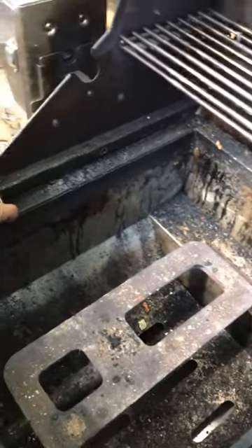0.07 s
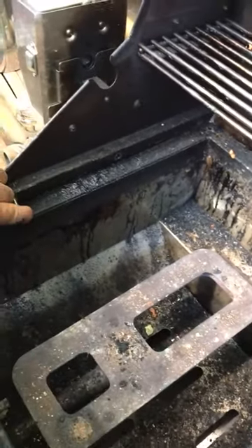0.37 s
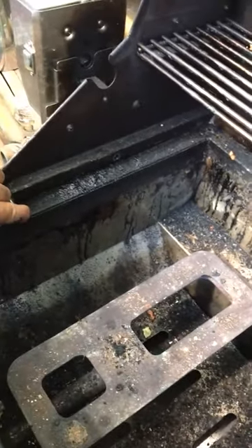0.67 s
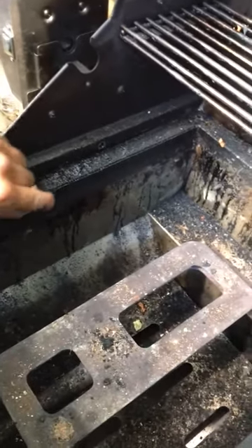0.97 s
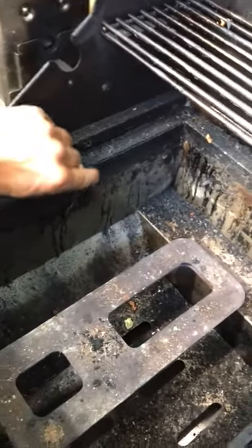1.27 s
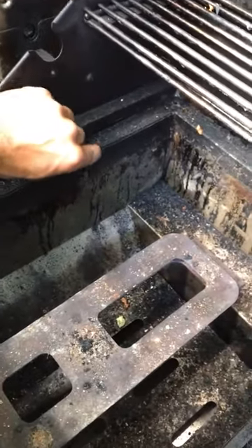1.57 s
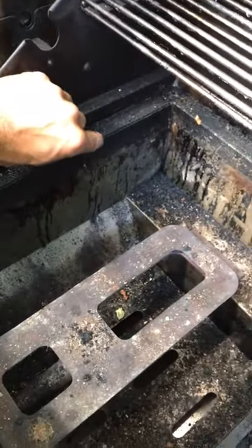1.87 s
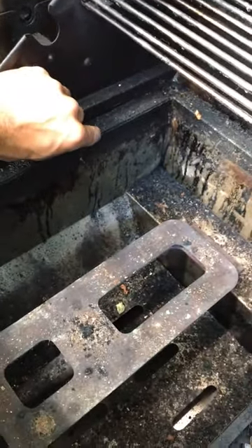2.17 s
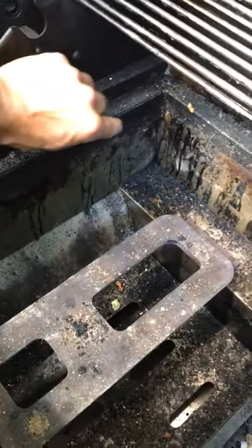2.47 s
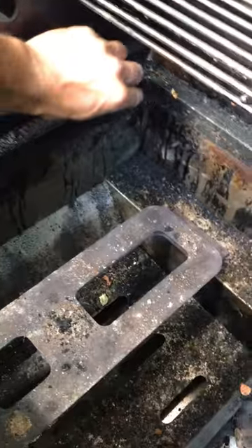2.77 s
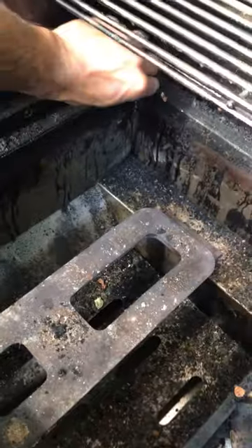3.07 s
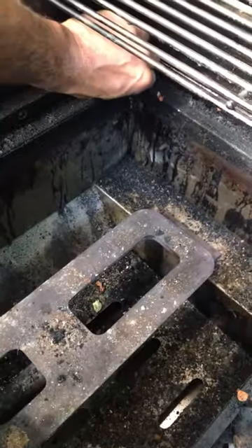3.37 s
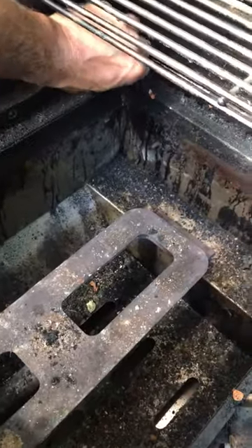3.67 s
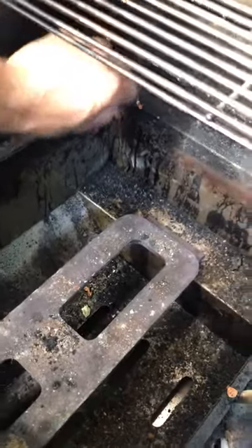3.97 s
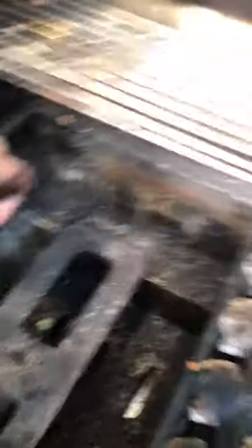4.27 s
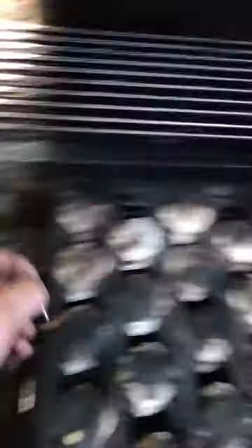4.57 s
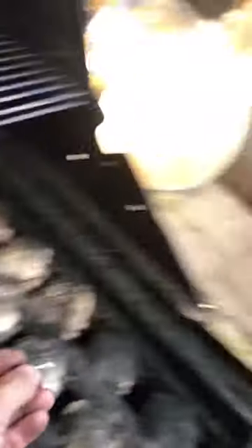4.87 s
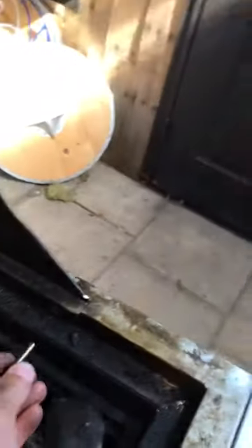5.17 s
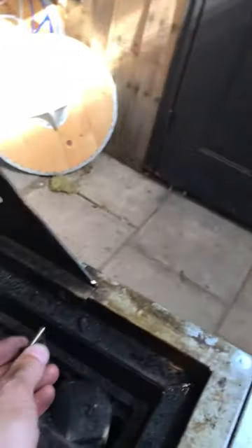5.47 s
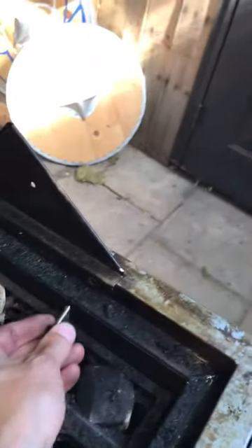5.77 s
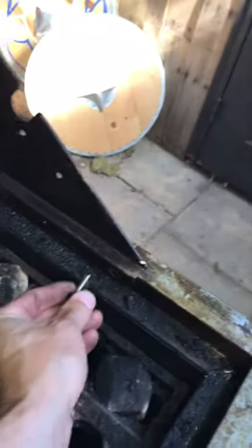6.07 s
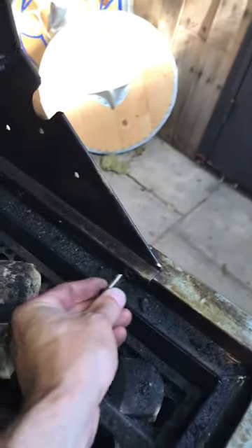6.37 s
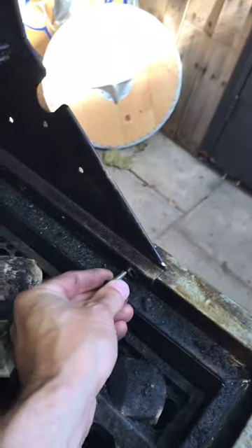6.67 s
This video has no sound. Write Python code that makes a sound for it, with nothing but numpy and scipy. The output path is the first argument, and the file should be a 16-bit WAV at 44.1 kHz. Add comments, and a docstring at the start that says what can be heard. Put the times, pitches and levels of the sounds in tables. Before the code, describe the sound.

A hand taps a small pin on barbecue steel with briefly ringing clicks while distant motors hum faintly outdoors.

```python
"""Sharp metal clicks with a brief ring: a hand works a small pin against a gas barbecue's firebox.
Each touch rings the pin and the greasy sheet steel, and the paved yard answers. Fingers rub the rim,
bump the warming rack once and draw back with a few dry ticks. Two distant motors drone under a soft
outdoor rumble; their balance shifts as the listener steps to the side of the barbecue."""
import sys
import numpy as np
from scipy import signal
from scipy.fft import rfft, irfft, next_fast_len
from scipy.io import wavfile

SR = 44100
rng = np.random.default_rng(int(sys.argv[2]) if len(sys.argv) > 2 else 0)


def unload_audio(sound):
    """Save the sound as a 16-bit wav file, at the path given as the first command line argument."""
    columns = np.transpose(np.atleast_2d(sound))
    # keep every value between -1 and 1, then stretch to whole-number steps
    steps = np.round(np.clip(columns, -1, 1) * 32767)
    wavfile.write(sys.argv[1], SR, steps.astype(np.int16))


N = 300762
TIME_S = np.arange(N) / SR

# Pin on steel. Each row: start in seconds, relative level in dB, contact pitch in Hz, fall below and
# above it in dB/octave, freedom to ring in dB, rim lift in dB, ping pitch in Hz, ping level in dB.
TOUCHES = [(0.718, -56, 5500, -1.5, 8, -4, 0, 4700, -60), (0.744, -43.5, 6150, 7, 16, -1, -3, 6470, -48),
           (0.750, -47, 7000, 3.5, 9, -5, 7, 2750, -57), (0.797, -37, 7200, 7, 9, -1, 7.5, 5170, -41),
           (0.804, -36.5, 1450, 6.5, 0, -5.5, -6, 8700, -42),
           (1.7594, -21, 3950, 10, 16, -12.5, -7, 8260, -37.5),
           (1.7618, -42, 2250, -0.5, 7, 3.5, 13, 2570, -24),
           (1.861, -51.5, 4000, 3.5, 11.5, 6, 3.5, 8100, -69),
           (1.9763, -19.5, 8200, 3, 17.5, -6.5, 1, 6620, -21.5),
           (1.9788, -23, 9800, 8, 19, 2, -2, 9590, -26), (1.983, -21, 2000, 11.5, 4.5, -2, 2, 1880, -22),
           (1.9845, -29, 6600, 9, 5.5, -0.5, 0, 6500, -26.5),
           (2.05, -18, 4930, 6, 16, -11.5, -13, 4750, -24.5),
           (2.0535, -27.5, 6100, 5.5, 8, -10.5, -10, 6056, -29),
           (2.334, -65.5, 6020, 0.5, 10, 10.5, 4, 6610, -57), (2.344, -58, 3500, 0, 13, -1, -2, 4500, -57),
           (2.356, -48.5, 4800, 1.5, 9, 0, -7, 3130, -50), (3.588, -50, 11500, 27, 18, -13, 1, 9770, -64),
           (6.742, -55, 1410, 5.5, 1.5, -5.5, 3.5, 1150, -53)]
# Clear modes of firebox and pin. Each row: pitch in Hz, relative level in dB, T60 in seconds.
STEEL_MODES = [(556, -7, .35), (594, -2, .26), (621, -3, .5), (656, -3.5, .42), (1272, -8, .45),
               (1305, -8, .25), (1353, -1, .2), (1460, -16, .35), (1565, -15, .3), (1826, -2.5, .16),
               (1852, -10, .3), (1908, -7, .3), (1974, -8, .24), (2086, -8.5, .25), (2140, -7, .17),
               (2210, -10, .33), (2298, -12, .25), (2350, -14, .22), (2477, -10, .23), (2548, -14, .19),
               (2768, -7, .13), (2860, -10, .19), (3190, -13, .2), (3365, -9, .13), (3413, -13, .16),
               (3780, -10, .11), (3930, -10, .14), (4350, -12, .16), (4490, -9, .12), (4576, -9, .14),
               (4745, -10, .11), (5017, -11, .14), (5130, -7.5, .12), (5600, -12, .13), (5776, -10, .11),
               (6056, -8, .1), (6503, -1, .09), (6605, -5, .1), (7063, -14, .16), (7250, -7, .14),
               (8030, -5, .07), (8660, -5, .105), (9520, -8, .07), (9590, -6, .07), (9935, -8, .07),
               (10039, -1, .08), (11300, -11, .08), (11640, -8, .08), (13200, -8, .08)]
# Yard reverberation. Each row: frequency in Hz, level re the blow in dB, T60 in seconds.
YARD = [(200, -5, 0.566), (625, 4, 0.45), (900, -2, 0.51), (1500, -7, 0.38), (2000, -5, 0.48),
        (5020, -7, 0.21), (9000, -16, 0.17), (15070, -22.5, 0.1692)]


def blows(hz, scatter_db, damping_share):
    """One impulse a touch, weighted at hz by contact and rim resonance; a tight grip damps the ring."""
    flat_below_hz, rim_hz, rim_width_oct = 780, 2576, 0.38
    near_rim = np.exp(-(np.log2(hz / rim_hz) / rim_width_oct) ** 2)
    impulses = np.zeros(N)
    for start_s, db, contact_hz, below_db_oct, above_db_oct, ring_db, rim_db, *_ in TOUCHES:
        octaves = np.log2(max(hz, flat_below_hz) / contact_hz)
        db -= abs(octaves) * (above_db_oct if octaves > 0 else below_db_oct)
        db += near_rim * rim_db + damping_share * ring_db
        impulses[round(start_s * SR)] = from_db(db + scatter_db * rng.standard_normal())
    return impulses


def steel_ring(level_db, scatter_db):
    """Each touch shares its force differently among the modes; neighbours swing in opposite senses."""
    waver_db, out = 1.5, 0
    for k, (hz, db, t60_s) in enumerate(STEEL_MODES):
        impulses = from_db(level_db + db) * blows(hz, scatter_db, damping_share=0.85)
        out += (-1) ** k * ring(impulses, hz, t60_s) * from_db(waver_db * drift(19))
        if hz < 3000:   # the hollow firebox holds the lower modes in a wavering afterglow
            _, tail_t60_s = at_hz(YARD, hz)
            out += np.sqrt(decay(impulses ** 2, tail_t60_s)) * noise_band(hz, width_hz=36, db=-13)
    return out


def pings():
    """The mode that swings most at the struck spot takes the first shock: a short ping."""
    out, modes_hz = 0, np.array(STEEL_MODES)[:, 0]
    for start_s, *_, ping_hz, ping_db in TOUCHES:
        hz = modes_hz[np.argmin(abs(modes_hz - ping_hz))]
        out += from_db(ping_db) * ring(signal.unit_impulse(N, round(start_s * SR)), hz, t60_s=0.047)
    return out


def sheet_clack(level_db, scatter_db):
    """A brief crack, then damped sheet modes blurring into a clack; the yard keeps a duller tail."""
    # Weak sheet modes. Each row: frequency in Hz, relative band level in dB, T60 in seconds.
    sheet = [(169, -4.5, 0.33), (301, -17, 0.23), (479, -25, 0.15), (628.6, -5, 0.06), (720, -19.5, 0.1295),
             (935, -5.5, 0.093), (1298, 0, 0.066), (2287, -4.5, 0.052), (3270, -6, 0.15),
             (4620, -1.5, 0.041), (7000, -0.5, 0.05), (9600, -1.5, 0.083), (10680, -6.5, 0.055),
             (11910, 1, 0.0477), (14780, -8.5, 0.037)]
    edges_hz = np.geomspace(20, 17000, 40)   # quarter octaves
    centres_hz = np.sqrt(edges_hz[1:] * edges_hz[:-1])
    crowds = [mode_crowd(spacing_hz=104.9, blur=0.66) for _ in range(2)]
    out = np.zeros(N)
    for k in np.flatnonzero(centres_hz > sheet[0][0]):
        hz, low_hz, high_hz = centres_hz[k], edges_hz[k], edges_hz[k + 1]
        db, t60_s = at_hz(sheet, hz)
        yard_db, yard_t60_s = at_hz(YARD, hz)
        hardness = 2 * hz ** 2 / (hz ** 2 + 1500 ** 2)   # a light pin cracks mainly in the treble
        crack = hardness * decay(blows(hz, scatter_db, damping_share=0) ** 2, t60_s=0.01216)
        stored = blows(hz, scatter_db, damping_share=0.49) ** 2
        energy = crack + decay(stored, t60_s) + from_db(yard_db) ** 2 * decay(stored, yard_t60_s)
        envelope = np.sqrt(energy * SR / 2 / (high_hz - low_hz))
        out += from_db(level_db + db) * bandpass(crowds[k % 2] * envelope, low_hz, high_hz)
    return out


def pin_clicks():
    """Pin strikes steel: ping, ring and echoed clack, with a narrow hollow in the treble."""
    # Reflections off firebox walls and raised lid. Each row: delay in seconds, gain.
    lid_echoes = [(.0023, 0.16), (.0052, -0.14), (.0094, .22)]
    notch_hz, notch_width_hz = 10400, 550
    clicks = pings() + steel_ring(level_db=-6.0, scatter_db=2.9)
    clicks += echoed(sheet_clack(level_db=-9.5, scatter_db=1.96), lid_echoes)
    return signal.lfilter(*signal.iirnotch(notch_hz, notch_hz / notch_width_hz, fs=SR), clicks)


def rack_knock(start_s):
    """A soft bump wakes clusters of modes, most around a clear tone; the treble dies first."""
    # Rack and hood resonances. Each row: pitch in Hz, width in Hz, level in dB, T60 in seconds,
    # tone share from 0 to 1.
    clusters = [(224, 53, -54, 0.68, .3), (312, 33, -58, 0.63, 0.8), (422, 240, -49, 0.16, 0),
                (638, 87, -51, 0.6, 0.43), (876, 180, -48.5, 0.49, 0.04), (987, 110, -52.5, 0.31, 0.2),
                (1050, 840, -47, .05, 0.2), (1063, 150, -49.5, 0.39, 0.1), (1200, 74, -57.5, 0.41, 0.3),
                (1610, 220, -64.5, 0.27, 0.1), (2100, 430, -53.5, 0.28, 0.15),
                (4880, 650, -50.5, 0.12, 0.1), (5760, 540, -54.5, 0.088, 0), (9500, 800, -57, 0.041, 0.2),
                (13000, 2500, -64.5, .04, 0)]
    out, age_s = 0, TIME_S - start_s
    for hz, width_hz, db, t60_s, tone_share in clusters:
        envelope = (age_s > 0) * from_db(db - 60 * np.clip(age_s / t60_s, 0, 3))
        noise = np.sqrt((1 - tone_share) * SR / 2 / width_hz) * rng.standard_normal(N)
        tone = np.sqrt(2 * tone_share) * np.sin(2 * np.pi * hz * age_s)
        out += bandpass(envelope * (noise + tone) + 1e-18, hz - width_hz / 2, hz + width_hz / 2)
    return out


def dry_ticks():
    """The hand draws back: very short cracks with duller after-rings, and a soft scrape."""
    # Ticks. Each row: start in seconds, crack level in dB, after-ring level in dB.
    ticks = [(4.203, -57, -61), (4.207, -56, -59), (4.2305, -47, -57), (4.235, -47, -63),
             (4.2708, -46, -56), (4.3078, -45, -44.5), (4.311, -53, -49.5), (4.319, -54, -52)]
    # Crack and after-ring spectra. Each row: frequency in Hz, relative density in dB.
    crack_colour = [(700, 3.5), (1500, 0), (2450, 4), (3300, -2), (5000, 0.5), (8500, -6.5), (10000, -21),
                    (16000, -24)]
    ring_colour = [(900, 6.5), (1700, -5.5), (2150, 3), (2450, 8.5), (3200, 1), (6500, -6.5), (9000, -25),
                   (10200, -31), (16000, -30)]
    crack_power, ring_power = np.zeros((2, N))
    for start_s, crack_db, ring_db in ticks:
        onset = round(start_s * SR)
        crack_power[onset], ring_power[onset] = from_db([crack_db, ring_db]) ** 2
    scrape = skin_friction([(4.29, 0.054, -62)], crack_colour, grain_db=3.5)
    cracks = np.sqrt(decay(crack_power, t60_s=.014)) * coloured_noise(crack_colour)
    rings = np.sqrt(decay(ring_power, t60_s=.14)) * coloured_noise(ring_colour)
    return scrape + cracks + rings


def skin_friction(strokes, colour, grain_db):
    """Skin catches and slips on the crusted rim: short swells of grainy hiss."""
    pressure = sum(from_db(db) * np.exp(-.5 * ((TIME_S - peak_s) / sigma_s) ** 2)
                   for peak_s, sigma_s, db in strokes)
    return pressure * rms_one(coloured_noise(colour) * from_db(grain_db * drift(97)))


def rim_rubs():
    """Fingers rub the rim; a fingertip skids off it with a thin hiss."""
    # Finger strokes. Each row: peak time in seconds, Gaussian width in seconds, level in dB.
    rubs = [(1.478, 0.025, -74), (2.352, 0.014, -63), (2.64, 0.036, -72), (3.208, 0.013, -74),
            (3.735, 0.014, -72)]
    slips = [(3.385, 0.0065, -58.5), (3.396, 0.011, -59)]
    # Their spectra. Each row: frequency in Hz, relative density in dB.
    rub_colour = [(1500, -1), (4000, -1), (6500, -5), (10000, -5), (13000, -9), (16000, -8)]
    slip_colour = [(3000, -6), (6000, -10.5), (8500, -6), (10000, -1), (12500, 0), (16000, -14.5)]
    return skin_friction(rubs, rub_colour, grain_db=2.5) + skin_friction(slips, slip_colour, grain_db=2)


def motor(firing_hz, orders, waver_db, fundamental_fade_db=0):
    """Only a far motor's low harmonics carry; their balance depends on where one stands."""
    out = 0
    for multiple, firebox_db, side_db in orders:
        db = firebox_db + side_share() * (side_db - firebox_db) + multiple * waver_db * drift(3.94)
        out += harmonic(firing_hz, multiple, db - fundamental_fade_db * (multiple == 1))
    return out


def distant_motors():
    """Two motors beat against each other as both slow; a fainter whir sinks with them."""
    # Motor harmonics. Each row: multiple, level at the firebox in dB, level at the side in dB.
    orders_a = [(1, -53, -50.5), (2, -51.5, -46.5), (3, -74.5, -74.5)]
    orders_b = [(2, -53, -51.5), (3, -69, -59), (4, -65, -65), (5, -69.5, -68.5)]
    a_hz = 78.63 - 1.07 * np.maximum(TIME_S - 3.7, 0)
    b_hz = 68.55 - .135 * TIME_S
    fade_db = 6 * np.maximum(TIME_S - 5.4, 0)
    whir = harmonic(175.5 - 1.8 * TIME_S, multiple=1, db=-63 + 2 * drift(2.017))
    motor_a = motor(a_hz, orders_a, waver_db=0.5, fundamental_fade_db=fade_db)
    return motor_a + motor(b_hz, orders_b, waver_db=0.37) + whir


def outdoors():
    """Far rumble with boomy bands, one swelling late, and faint hiss; the open firebox sings along."""
    # Boomy bands. Each row: centre in Hz, width in Hz, level in dB.
    booms = [(56.7, 3, -57), (107.3, 7.2, -58.5), (118.7, 4.2, -63.5)]
    # Outdoor spectra. Each row: frequency in Hz, relative density in dB.
    rumble = [(20, -25.5), (35, -2), (50, 2.5), (90, 6), (170, -0.5), (220, -8.5), (360, -9), (430, -17),
              (650, -12.5), (800, -17.5), (1200, -16.5), (1800, -27), (3000, -50)]
    hiss = [(800, -8), (1500, 2.5), (2100, 5), (2800, 2), (4000, 2), (5000, -6.5), (6000, -5.5),
            (7500, -12.5), (9600, -12), (10500, -19), (11800, -13), (16400, -14.5)]
    # Reflections off paving and fence. Each row: delay in seconds, gain.
    wall_echoes = [(.0016, -0.071), (.0031, -0.0408), (.0092, .14)]
    swell_at_s, swell_rise_s = 5.14, 0.78
    drone = sum(noise_band(*row) for row in booms)
    firebox_hum = (1 - side_share()) * noise_band(hz=655, width_hz=42, db=-77.5)
    yard_hum = side_share() * noise_band(hz=490, width_hz=51, db=-71)
    swell = np.clip((TIME_S - swell_at_s) / swell_rise_s, 0, 1) * noise_band(hz=375, width_hz=58, db=-65)
    air = from_db(-52.5) * coloured_noise(rumble) + from_db(-68) * coloured_noise(hiss)
    return drone + firebox_hum + yard_hum + swell + echoed(air, wall_echoes)


def side_share(step_at_s=3.68, step_s=0.93):
    """The listener's way from the firebox (0) to the side of the barbecue (1)."""
    return np.clip((TIME_S - step_at_s) / step_s, 0, 1)


def from_db(db):
    """Decibels to gain."""
    return 10 ** (np.asarray(db) / 20)


def rms_one(x):
    """Scale to unit rms."""
    return x / np.sqrt(np.mean(x ** 2) + 1e-20)


def at_hz(rows, hz):
    """Each column of a spectrum, interpolated in log frequency."""
    points_hz, *columns = np.transpose(rows)
    return [np.interp(np.log(hz), np.log(points_hz), column) for column in columns]


def drift(rate_hz):
    """Smooth random wander, spread 1."""
    hop, settle = 100, 1000
    pole = np.exp(-2 * np.pi * hop * rate_hz / SR)
    noise = rng.standard_normal(N // hop + settle + 2)
    slow = signal.lfilter([1], [1, -2 * pole, pole * pole], noise)[settle:]
    return np.interp(np.arange(N) / hop, np.arange(len(slow)), rms_one(slow))


def bandpass(x, low_hz, high_hz):
    """Butterworth band-pass."""
    return signal.sosfilt(signal.butter(2, [low_hz, high_hz], "band", fs=SR, output="sos"), x)


def decay(power, t60_s):
    """Stored energy leaks away by 60 dB in t60_s."""
    return signal.lfilter([1], [1, -np.exp(-np.log(10 ** 6) / (t60_s * SR))], power + 1e-24)


def ring(impulses, hz, t60_s):
    """A unit impulse starts a dying sine of height 1."""
    radius, angle = from_db(-60 / (t60_s * SR)), 2 * np.pi * hz / SR
    feedback = [1, -2 * radius * np.cos(angle), radius * radius]
    return signal.lfilter([0, np.sin(angle)], feedback, impulses + 1e-18)


def harmonic(firing_hz, multiple, db):
    """One motor harmonic at an rms level of db."""
    turns = np.cumsum(firing_hz) / SR
    return np.sqrt(2) * from_db(db) * np.sin(2 * np.pi * (multiple * turns + rng.random()))


def echoed(x, echoes):
    """Close reflections thicken a sound and ripple its spectrum."""
    return x + sum(gain * np.pad(x, round(delay_s * SR))[:N] for delay_s, gain in echoes)


def mode_crowd(spacing_hz, blur):
    """Unevenly spaced sines of equal strength, blurred by noise; rms 1."""
    size = next_fast_len(N)
    steps, phases = rng.random((2, 1000))
    hz = np.cumsum(spacing_hz * (.5 + steps))
    inside = hz < SR / 2
    lines = np.zeros(size // 2 + 1, complex)
    lines[(hz[inside] * size / SR).astype(int)] = np.exp(2j * np.pi * phases[inside])
    return rms_one(rms_one(irfft(lines, size)[:N]) + blur * rng.standard_normal(N))


def noise_band(hz, width_hz, db):
    """Narrow noise: a tone whose strength and phase wander."""
    phase = 2 * np.pi * hz * TIME_S
    return from_db(db) * (drift(width_hz / 2) * np.cos(phase) + drift(width_hz / 2) * np.sin(phase))


def coloured_noise(spectrum):
    """Steady noise with the given spectrum; rms 1."""
    size = next_fast_len(N)
    hz = np.maximum(np.fft.rfftfreq(size, 1 / SR), 1)
    inside = (hz > spectrum[0][0]) & (hz < spectrum[-1][0])
    gain = from_db(at_hz(spectrum, hz)[0]) * inside
    return rms_one(irfft(rfft(rng.standard_normal(size)) * gain, size)[:N])


def scene():
    """Clicks, rubs, a knock and ticks in front of the drone; mono."""
    handling = pin_clicks() + rim_rubs() + rack_knock(start_s=3.404) + dry_ticks()
    return (handling + distant_motors() + outdoors())[None]


def record(dry):
    """Steep low-pass at 16 kHz."""
    return signal.sosfilt(signal.ellip(10, .1, 80, 16000, fs=SR, output="sos"), dry)


dry = scene()
out = record(dry)
unload_audio(out)
```